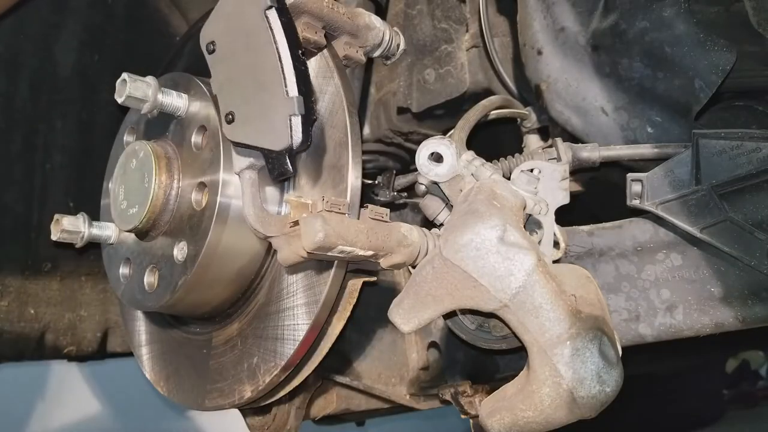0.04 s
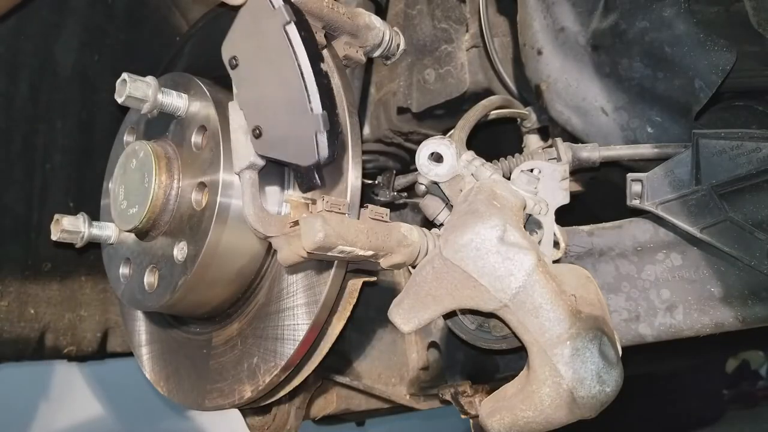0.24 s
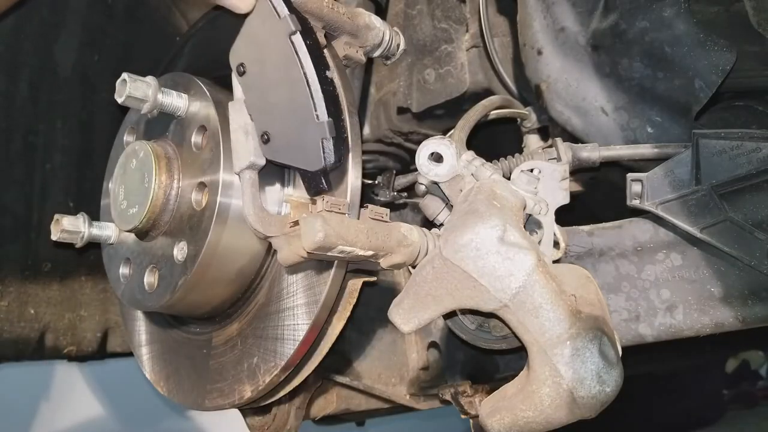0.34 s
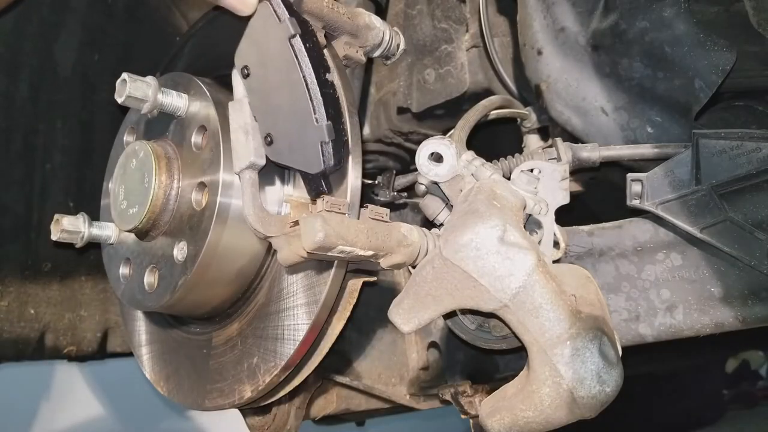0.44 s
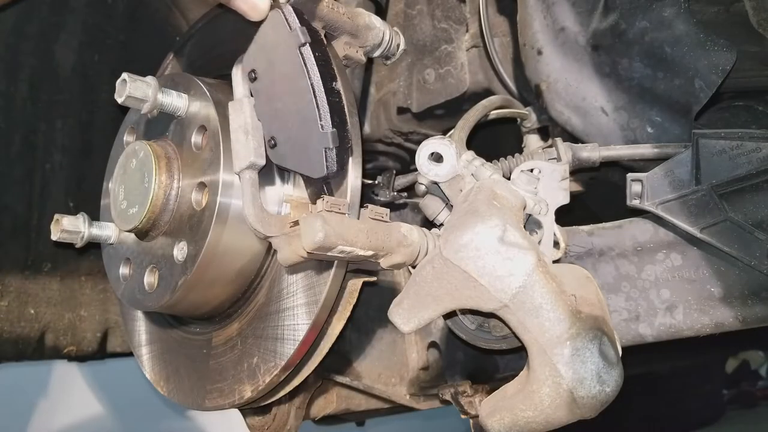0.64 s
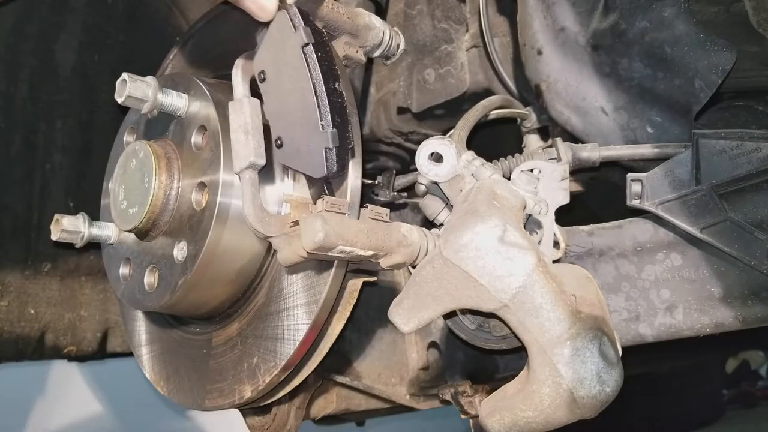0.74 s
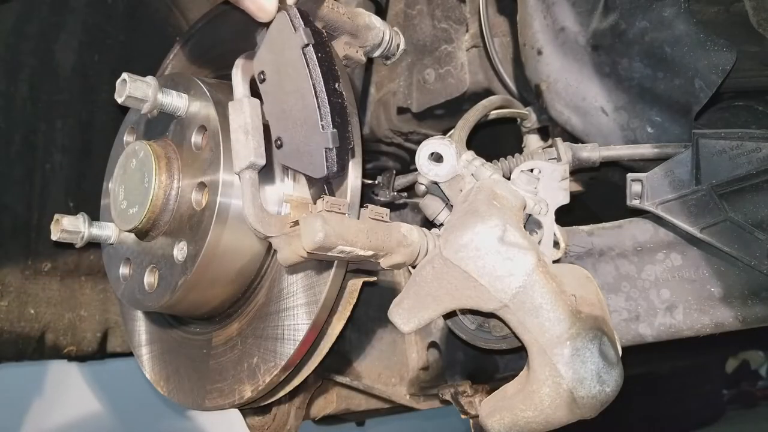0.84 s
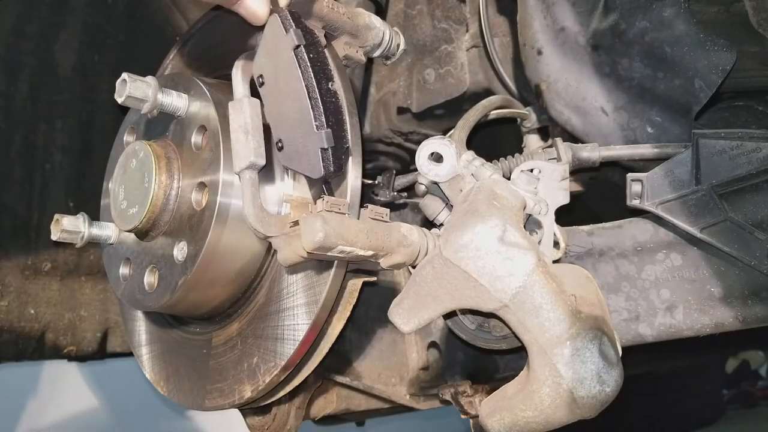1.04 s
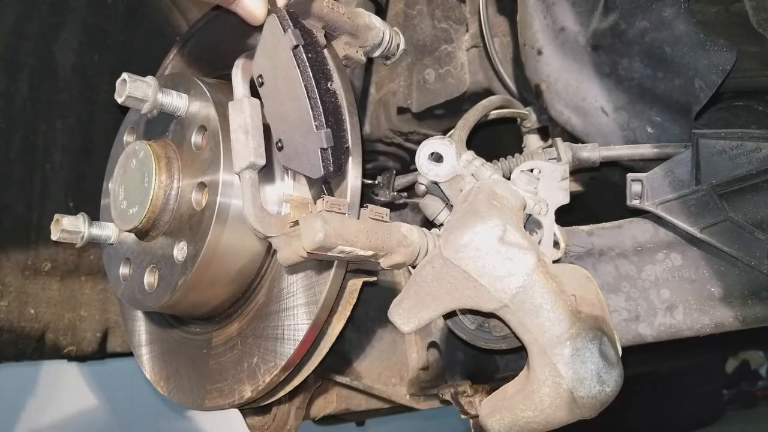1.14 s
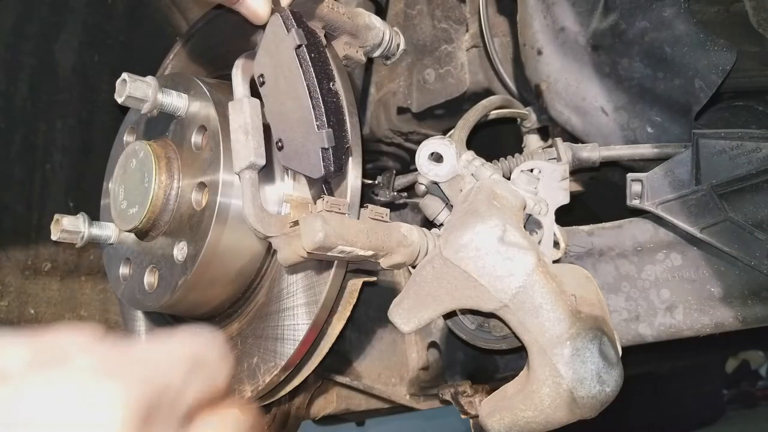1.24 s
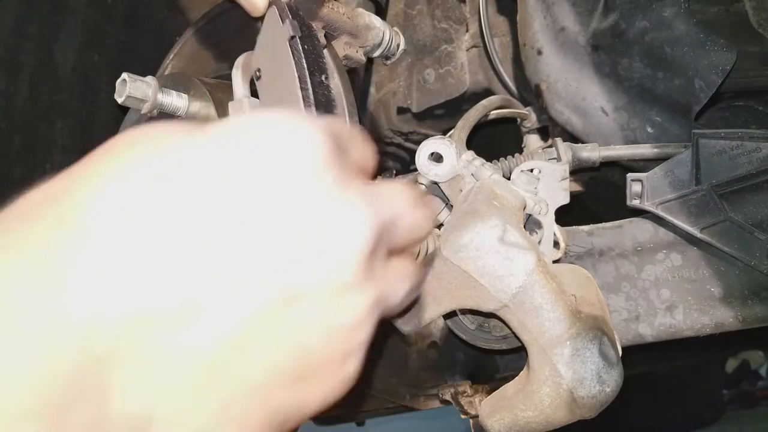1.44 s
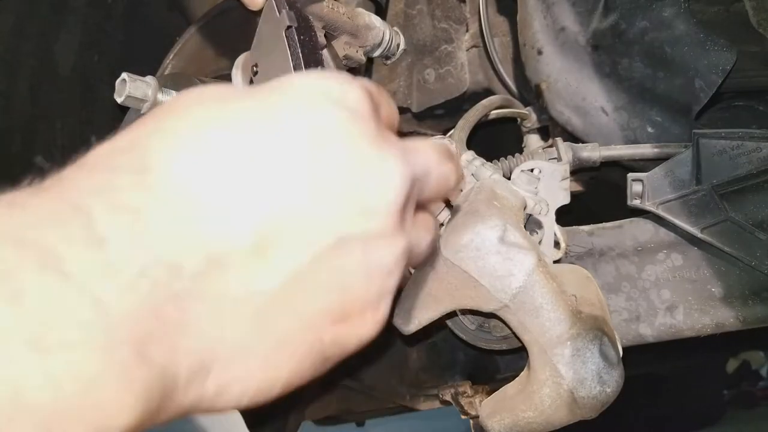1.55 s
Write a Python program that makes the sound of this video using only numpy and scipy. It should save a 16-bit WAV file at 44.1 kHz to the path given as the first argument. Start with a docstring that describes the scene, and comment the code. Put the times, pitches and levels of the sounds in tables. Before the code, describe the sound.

A brake pad knocks sharply into its steel bracket, then rubs, rattles and ticks against a spring clip before settling; a sleeve rustles and a late knock follows, close to a stereo phone in a humming garage.

```python
"""In a garage, a brake pad is worked into its steel bracket close to a stereo phone.
Knocks and rub grains ring decaying bracket and hub modes; noise makes thumps, low thuds and scrapes.
Short noise chatters ring a spring clip; shaped hiss and a snap make a sleeve, mostly on the left.
A distant machine hums in two wavering bands over room and microphone hiss."""
import sys
import numpy as np
from scipy import signal
from scipy.fft import rfft, irfft
from scipy.io import wavfile
from scipy.ndimage import uniform_filter1d

SR = 44100
rng = np.random.default_rng(int(sys.argv[2]) if len(sys.argv) > 2 else 0)


def store_pcm(level_fs):
    """Save levels as 16-bit WAV."""
    pcm = np.round(np.clip(level_fs, -1, 1) * 32767).astype(np.int16)
    wavfile.write(sys.argv[1], SR, np.atleast_2d(pcm).T)


def how_loud(loudness_db):
    """Turn decibels into a plain amplitude multiplier (0 dB gives 1, 20 dB gives 10)."""
    steps = np.asarray(loudness_db, float) / 20
    return 10 ** steps


N = 70560
TIME_S = np.arange(N) / SR

# knocks of the pad: [t/s, drive level/dB, brightness/(dB per octave above 750 Hz),
# weight of modes below 640 Hz/dB]
PAD_KNOCKS = [(.05, -61, -2.5, -5.5), (.2325, -37.5, 10, -20), (.2362, -19.5, 3, 1.5),
              (.345, -41.5, -0.5, 16.5), (.365, -51, -42, 17.5), (.444, -42.5, -29, 14),
              (.479, -28.5, -47, 2), (0.578, -61, 1, 8), (.75, -63, -16, 17.5), (.72, -54, -23, -20),
              (.879, -59.5, -52, 16), (.9, -56, -36, 9.5), (1.424, -39, -27, 7.5),
              (1.443, -46.5, -14.5, -4), (1.534, -63, -27, -16), (1.558, -59.5, -28, -11),
              (1.594, -37.5, -20, 20)]


def level(x, db):
    """Scale to an rms level in dB."""
    return x * how_loud(db) / np.sqrt(np.mean(x ** 2))


def colour(x, table):
    """Shape the spectrum by (f/Hz, gain/dB) points."""
    points = np.array(table)
    hz = np.maximum(np.arange(N // 2 + 1) * SR / N, 1)
    gain_db = np.interp(np.log(hz), np.log(points[:, 0]), points[:, 1], left=-90, right=-90)
    return irfft(rfft(x) * how_loud(gain_db), N)


def ring(x, hz, t60, rise_s=.0018):
    """One mode that swells quickly and dies away; complex output, a bare envelope at 0 Hz."""
    turn = np.exp(2j * np.pi * hz / SR)
    rise = np.exp(-1 / (rise_s * SR))
    decay = np.exp(-np.log(1000) / (t60 * SR))
    swelling = signal.lfilter([1 - rise], [1, -rise * turn], x)
    return signal.lfilter([1], [1, -turn * decay], swelling)


def pan(db):
    """Left and right gains for a left-right difference in dB."""
    return how_loud(np.array([[db / 2], [-db / 2]]))


def walk(rate):
    """Smoothed random steps, rate per second; their spread is 1 before smoothing."""
    k = int(SR / rate)
    steps = np.repeat(rng.standard_normal(N // k + 1), k)
    return uniform_filter1d(steps, k)[:N]


def impulses(times_s, db):
    """Single-sample strikes at the given times and levels."""
    x = np.zeros(N)
    x[(np.asarray(times_s) * SR).astype(int)] = how_loud(db)
    return x


def garage():
    """Resonant noise hums in two wavering bands; the hiss is alike left and right in the bass."""
    # machine hum: [f/Hz, width of the decay resonance/Hz]
    hum_bands = [(66, 5.5), (106, 9.5)]
    # wavering of the hum: [t/s, low band level/dB, upper band level against it/dB]
    waver = np.array([(0.0, -49.5, 8.5), (0.102, -50.5, -12), (0.31, -56.5, 0.5), (0.628, -52, -2),
                      (0.752, -58, 8), (0.796, -50.5, -9), (0.842, -59.5, 5), (0.868, -51.5, -6),
                      (0.952, -57, 8.5), (1.002, -57.5, -4), (1.136, -53, 1), (1.18, -68, 7),
                      (1.296, -53.5, 0), (1.438, -71, 9.5), (1.478, -51.5, 0), (1.6, -61.5, 6.5)])
    # spectrum of room and microphone hiss: [f/Hz, gain/dB]
    air_spectrum = [(21, -20.5), (35, -12), (86, -5.5), (163, -10.5), (543, -45.5), (739, -20.5),
                    (819, -52), (955, -49.5), (1090, -45), (1300, -39), (1400, -40.5), (16000, -43.5)]
    low_db = np.interp(TIME_S, waver[:, 0], waver[:, 1])
    high_db = low_db + np.interp(TIME_S, waver[:, 0], waver[:, 2])
    noise = rng.standard_normal((3, N))
    source = noise[0] + 0.091 * noise[1:]  # mostly common to both sides
    hum = 0
    for (hz, width_hz), db in zip(hum_bands, (low_db, high_db)):
        band = ring(source, hz, np.log(1000) / np.pi / width_hz, 0.025).imag
        hum = hum + level(band, 0) * how_loud(db)
    noise = rng.standard_normal((3, N))
    # below about 900 Hz each side's own noise gives way to a common one
    swap = signal.lfilter(*signal.butter(1, 900, fs=SR), noise[0] - noise[1:])
    return hum + level(colour(noise[1:] + swap, air_spectrum), -62)


def bracket():
    """Knocks and rub grains excite one set of modes, each reaching left and right differently."""
    # bracket and hub modes: [f/Hz]
    modes_hz = [222, 287, 353, 382, 468, 507, 613, 675, 710, 742, 787, 842, 887, 924] + [959, 1008, 1050, 1248, 1346, 1601, 1669, 1750, 1798, 2024, 2223, 2573,
                                     2770, 3150]
    # response of each mode: [drive level/dB, t60/s, left-right/dB, left lead/rad]
    mode_table = [(-30, 0.61, -1.5, 1.5), (-21, 0.1, 3, .2), (-29, 0.23, 1, .3), (-24, 0.49, 1, 1.8),
                  (-26, 0.23, 4, .4), (-23, 0.24, -0.5, -0.5), (-26, 0.54, 4, -0.61),
                  (-15.5, 0.18, 1.5, 2.7), (6.5, 0.11, 1, 0.63), (-10.5, .4, 14.5, -1),
                  (-15.5, 0.37, -12.5, 0.84), (-5, 0.2, 6, -1), (-10, .25, -2.2, 1.3),
                  (-5.5, 0.26, -2.5, 1.9), (-11, 0.32, -2.5, -1.7), (-6, 0.24, -0.5, 1.64),
                  (-24, .15, -6.8, 3), (-8, 0.14, 3.1, 1.6), (-30.5, 0.44, 5.5, -1.2),
                  (-19.5, 0.12, 2, 1.2), (-28, 0.54, 4.5, 1.3), (-28.5, 0.34, -8.5, -1.5),
                  (-22, 0.34, 8, 3.1), (-42.5, 0.71, 15.5, 2), (-31, 0.27, 3, -2.5), (-32, 0.14, 9, 4.1),
                  (-37, 0.12, -1, -2.1), (-38.5, 0.29, 3.5, 2.8)]
    # pad rubbing along the bracket: [t/s, drive level/dB, brightness/(dB per octave above 750 Hz)]
    rub = np.array([(0, -50, -4.5), (.06, -59.5, -14), (0.122, -71.5, -12), (.22, -88.5, -5.5),
                    (.3, -46, -7), (0.401, -42.5, -0.7), (0.471, -39, -5.5), (0.549, -56, -11),
                    (0.681, -64, -16), (.77, -59.5, -7), (.84, -89, -13), (.96, -61, -27),
                    (1.152, -75, -8.5), (1.3, -92, -14), (1.341, -69, -3), (1.38, -60, -3), (1.41, -60, 1),
                    (1.472, -61.5, 9), (1.6, -45.5, -26)])
    knocks = np.array(PAD_KNOCKS)
    spot_db = 4 * rng.standard_normal((len(knocks), len(mode_table)))  # each knock drives its own mix
    grains = (rng.random(N) < 380 / SR) * rng.standard_normal(N)  # about 380 grains per second
    grains = grains * how_loud(5.5 * walk(37))
    rub_db = np.interp(TIME_S, rub[:, 0], rub[:, 1])
    rub_tilt = np.interp(TIME_S, rub[:, 0], rub[:, 2])
    out = 0
    for m, (hz, (db, t60, pan_db, lead)) in enumerate(zip(modes_hz, mode_table)):
        octaves = max(np.log2(hz / 750), 0)
        low = hz < 640
        knock_tone_db = knocks[:, 3] if low else knocks[:, 2] * octaves
        rub_tone_db = 8 if low else rub_tilt * octaves
        drive = impulses(knocks[:, 0], knocks[:, 1] + db + knock_tone_db + spot_db[:, m])
        drive += grains * how_loud(-9.5 + db + rub_db + rub_tone_db)
        phase = np.exp(.5j * lead * np.array([[1], [-1]]))
        flutter = how_loud(2.2 * walk(35))  # the loose pad damps each mode unevenly
        out = out + pan(pan_db) * flutter * np.imag(ring(drive, hz, t60) * phase)
    return out


def scrapes():
    """Brief scrapes of the pad's edge: rough bands of noise that swell and fade."""
    # [middle t/s, length between 1/e points/s, level before swell, roughness and pan/dB,
    # f/Hz, width of each of two resonances/Hz, left-right/dB]
    scrape_table = [(0.048, 0.063, -74, 2775, 280, 7.5), (0.39, 0.046, -76.5, 5320, 543, 4),
                    (0.47, 0.065, -65, 2890, 480, 6), (.46, 0.09, -67, 6800, 4950, 4),
                    (0.605, 0.055, -75.5, 3580, 210, 7), (.61, 0.057, -65.5, 1260, 200, 0),
                    (0.775, 0.071, -79, 2560, 300, 13.5), (1.013, 0.16, -81.5, 4800, 400, 17.5),
                    (1.45, 0.072, -72, 2750, 199, 3.5), (.15, 0.195, -65.5, 840, 61, 5.5),
                    (1.37, 0.053, -57.5, 730, 98, 4), (0.66, 0.13, -77.5, 7000, 4700, 12.5),
                    (0.76, 0.1, -68.5, 990, 430, 9), (1.553, .04, -62.5, 1060, 240, 5)]
    noise = rng.standard_normal((3, N))
    source = noise[0] + 1.66 * noise[1:]
    out = 0
    for s, length, db, hz, width_hz, pan_db in scrape_table:
        tau = 1 / np.pi / width_hz
        band = ring(source, hz, np.log(1000) * tau, tau).imag
        swell = np.exp(-(2 * (TIME_S - s) / length) ** 2)
        roughness = how_loud(1.8 * walk(120))
        out = out + level(band, db) * swell * pan(pan_db) * roughness
    return out


def knock_thumps():
    """The noisy body of each knock: shaped noise under a fast rise and a decay."""
    # thump spectrum: [f/Hz, gain/dB]
    thump_spectrum = [(200, -36.5), (330, -13.5), (580, -18.5), (800, -5.5), (1160, -10), (1300, -12),
                      (1500, -18), (1720, -15.5), (1900, -30), (2700, -33), (5000, -51), (10000, -68)]
    knocks = np.array(PAD_KNOCKS)
    # duller knocks thump less: 1.04 dB per dB/octave of brightness
    strikes = impulses(knocks[:, 0], knocks[:, 1] - 11 + 1.04 * knocks[:, 2])
    envelope = ring(strikes, 0, .2, 0.0012).real
    noise = rng.standard_normal((3, N))
    return envelope * level(colour(noise[0] + 0.69 * noise[1:], thump_spectrum), 0)


def spring_clip():
    # clip modes: [f/Hz, gain/dB, t60/s]
    clip_modes = [(3520, -6, .04), (7000, -5, .05), (7800, -13.5, 0.027), (9000, 0, 0.017),
                  (10340, -27, .02), (11600, -12, 0.044), (12600, -10, .04), (14200, -7, .025),
                  (15400, 1.5, .025)]
    # ticks: [t/s, drive level/dB, left-right/dB, chatter decay time/s, strongest f/Hz]
    ticks = [(0.0994, -63, 6, 0.0014, 13200), (0.2862, -63.5, 3, 0.024, 11600),
             (0.3631, -65, 4, 0.0098, 7900), (0.434, -52, -4, 0.0043, 12300),
             (0.454, -76, -35, 0.022, 12900), (.47, -69, 14, 0.01, 12700), (0.5723, -50.5, 1, 0.02, 12040),
             (0.7113, -65, 13, 0.014, 11600), (0.9054, -65.5, 3, 0.012, 10900),
             (1.545, -67, -3.5, 0.0053, 9700), (1.55, -57, 2, 0.017, 9000), (1.597, -61, 15, .005, 4840)]
    out = np.zeros((2, N))
    for s, db, pan_db, chatter, top_hz in ticks:
        start, stop = int(s * SR), int(s * SR) + SR // 5
        age = TIME_S[start:stop] - s
        envelope = np.exp(-age / chatter) * (1 - np.exp(-age / 0.0019))
        noise = envelope * rng.standard_normal((2, len(age)))
        drive = noise[0] + 1.8 * noise
        tone = 0
        for hz, gain_db, t60 in clip_modes:
            focus_db = -36 * np.log2(hz / top_hz) ** 2  # -36 dB one octave away
            spot_db = 3 * rng.standard_normal()
            tone = tone + how_loud(gain_db + spot_db + focus_db) * ring(drive, hz, t60, 0.00047).imag
        tone = tone / np.sqrt(chatter * SR)  # offsets the energy of longer chatters
        hiss = how_loud(-2) * ring(drive, top_hz, 0.00013, .00005).imag
        out[:, start:stop] += how_loud(db) * pan(pan_db) * (tone + hiss)
    return out


def thuds():
    """Hand and pad thud through the suspension: low noise bands start fast and die away."""
    # [t/s, level before rise and pan/dB, f/Hz, t60/s, narrowness (divides the bandwidth)]
    thud_table = [(0.242, -38, 286, 0.49, 0.81), (0.344, -36.5, 340, 0.12, 1.9),
                  (0.361, -38, 216, 0.17, 1.1), (0.428, -46, 203, 0.24, 1.2), (0.489, -37, 314, 0.11, 0.98),
                  (0.552, -47.5, 136, 0.17, 1.44), (0.642, -50, 154, 0.22, 0.75),
                  (0.707, -49, 373, 0.19, 0.48), (0.744, -45, 126.5, 0.26, 0.76),
                  (0.749, -45, 456, 0.037, 0.51), (0.882, -48, 266.6, 0.25, 1.74),
                  (1.001, -58.5, 249, 0.29, 2.5), (1.141, -59, 278, 0.28, 1.17),
                  (1.429, -56.5, 201, 0.6, 1.1), (1.439, -48.5, 378.2, 0.37, 13),
                  (1.594, -59, 310, 0.13, 1.9)]
    noise = rng.standard_normal((3, N))
    source = noise[0] + 0.43 * noise[1:]
    out = 0
    for s, db, hz, t60, narrow in thud_table:
        envelope = ring(impulses([s], db), 0, t60, 0.0016).real
        tau = narrow / (np.pi * 0.63 * hz)  # each resonance is 0.63 * hz / narrow wide
        band = ring(source, hz, np.log(1000) * tau, tau).imag
        out = out + envelope * level(band, 0) * pan(0.82)
    return out


def sleeve():
    """Soft strokes of flickering cloth hiss and one dry, very short snap, stronger on the left."""
    # strokes: [start t/s, attack/s, hold/s, release/s, level before flicker and pan/dB,
    # brightness/(dB per octave about 7 kHz)]
    strokes = [(0.88, 0.068, 0.06, 0.19, -73, -4.5), (1.242, 0.084, 0.13, 0.11, -64.5, 0.9)]
    # cloth spectrum: [f/Hz, gain/dB]
    cloth_spectrum = [(1470, -30), (2500, -20.5), (3890, -18.5), (5560, -10.5), (7300, -4.5), (8600, -9),
                      (12600, -3), (16000, -4.5)]
    # snap: [t/s, drive level/dB, left-right/dB, f/Hz]
    s, db, pan_db, hz = (1.4396, -34.5, 8, 14003)
    out = pan(pan_db) * ring(impulses([s], db), hz, 0.0018, .00003).imag
    for start, attack, hold, release, db, tilt_db in strokes:
        tone = [(f, g + tilt_db * np.log2(f / 7000)) for f, g in cloth_spectrum]
        hiss = level(colour(rng.standard_normal((2, N)), tone), db)
        flicker = how_loud(1.6 * walk(29.64))
        corners_s = np.cumsum([start, attack, hold, release])
        stroke = np.interp(TIME_S, corners_s, [0, 1, 1, 0])
        out = out + hiss * flicker * stroke * pan(13.5)
    return out


def room_tail(near):
    """The garage's reverberation: decaying band-passed noise convolved with the mono sound."""
    # pass band edges: [f/Hz]
    band_hz = [300, 5000]
    t = np.arange(SR // 2) / SR
    decay = how_loud(-60 * t / .6) * (t > .012)  # t60 of 0.6 s after a 12 ms gap
    tail = level(rng.standard_normal((2, len(t))) * decay, -15) / np.sqrt(len(t))
    tail = signal.lfilter(*signal.butter(2, band_hz, "band", fs=SR), tail)
    return signal.fftconvolve(near.mean(axis=0)[None], tail, axes=1)[:, :N]


def scene():
    """Metal sounds with a short garage tail, then dry thuds, cloth, hum and hiss."""
    near = bracket() + scrapes() + knock_thumps() + spring_clip()
    return garage() + near + room_tail(near) + thuds() + sleeve()


def band_limit(x):
    """A steep low-pass at the top of the band."""
    return signal.sosfilt(signal.butter(12, 16500, fs=SR, output="sos"), x)


def record(dry):
    """The phone cuts the top steeply above 15.8 kHz."""
    low_pass = signal.ellip(8, .2, 70, 15800, fs=SR, output="sos")
    mix = signal.sosfilt(low_pass, dry)
    return band_limit(mix)


dry = scene()
out = record(dry)
store_pcm(out)
```